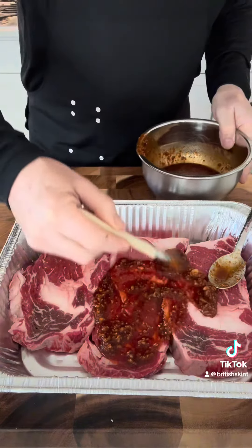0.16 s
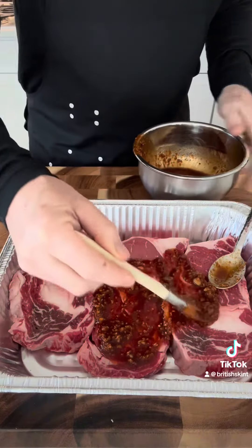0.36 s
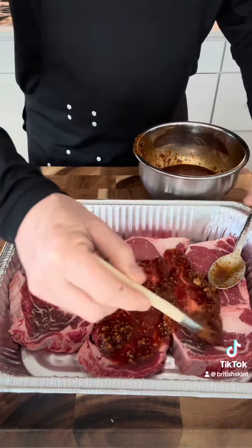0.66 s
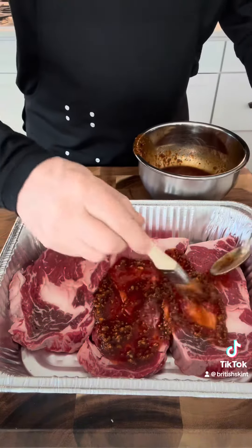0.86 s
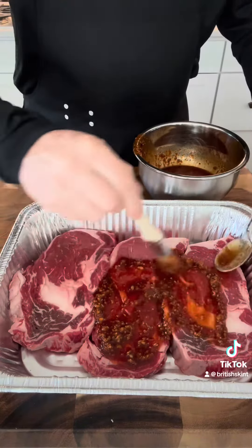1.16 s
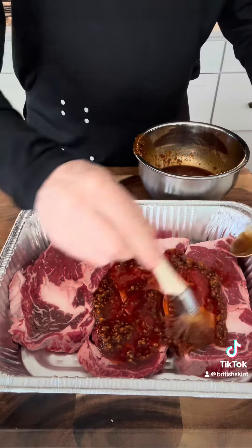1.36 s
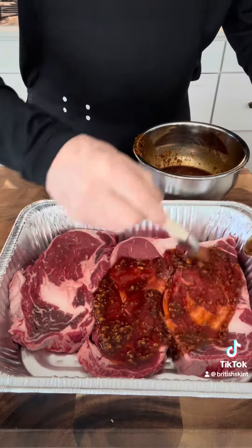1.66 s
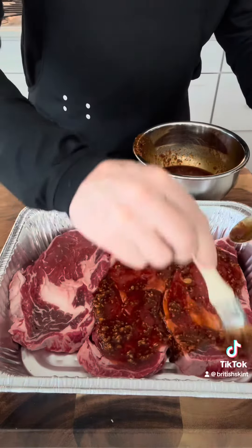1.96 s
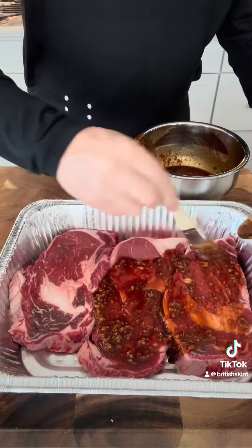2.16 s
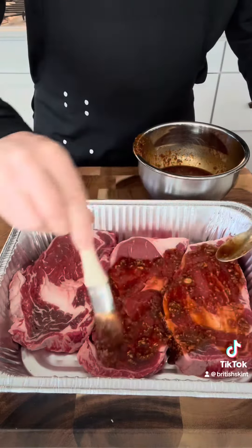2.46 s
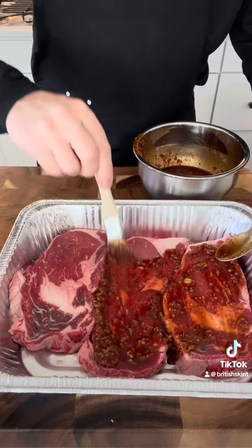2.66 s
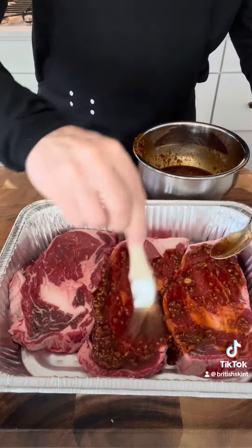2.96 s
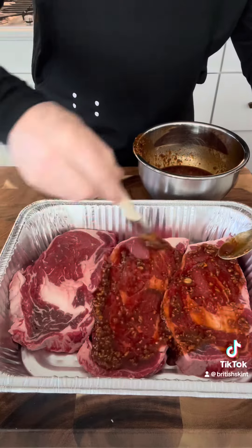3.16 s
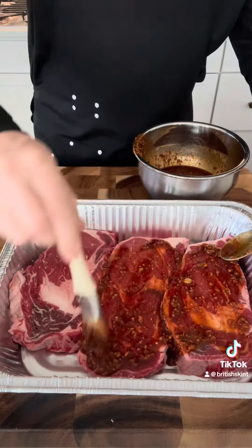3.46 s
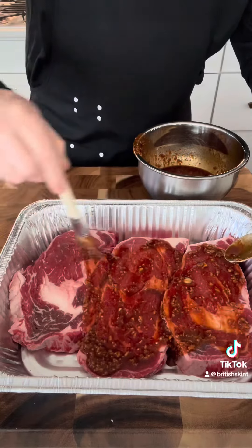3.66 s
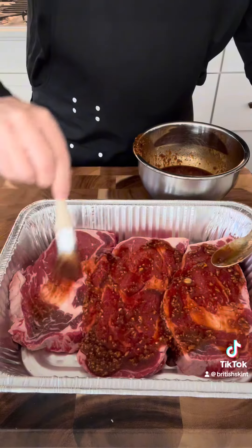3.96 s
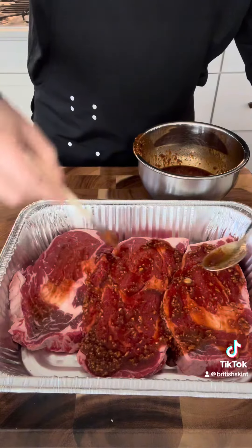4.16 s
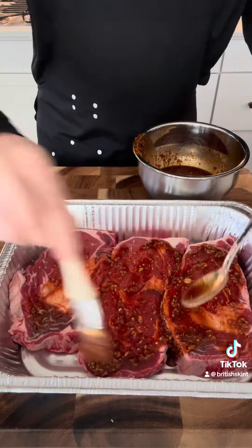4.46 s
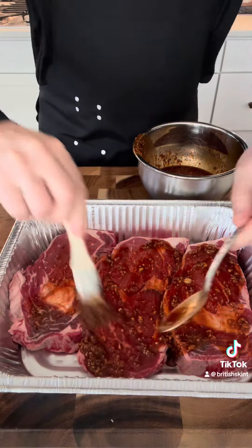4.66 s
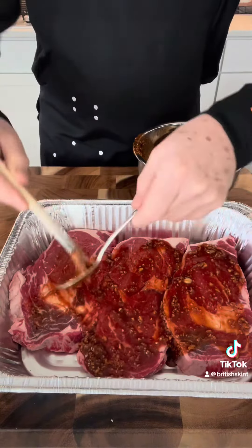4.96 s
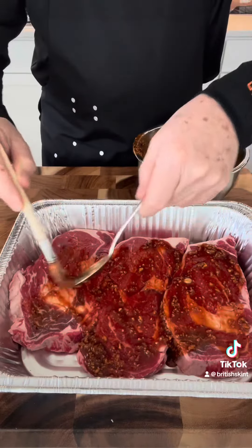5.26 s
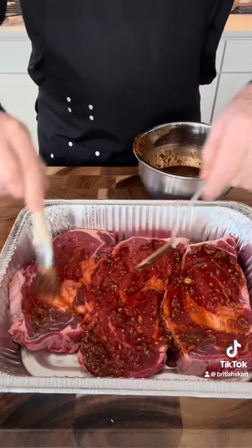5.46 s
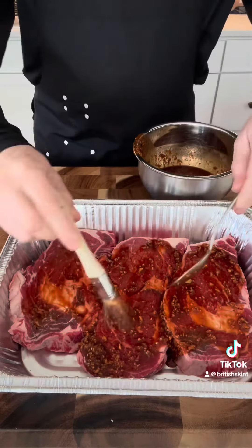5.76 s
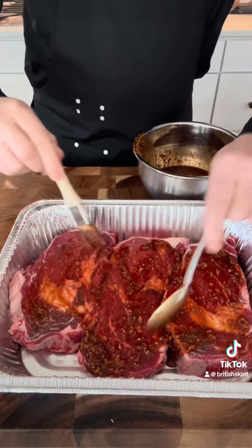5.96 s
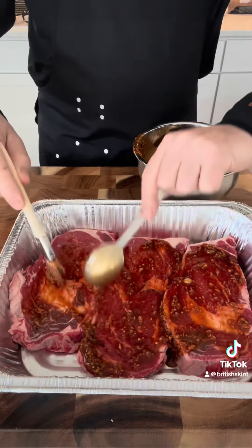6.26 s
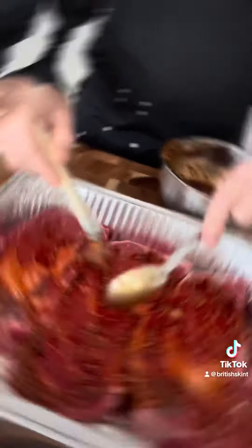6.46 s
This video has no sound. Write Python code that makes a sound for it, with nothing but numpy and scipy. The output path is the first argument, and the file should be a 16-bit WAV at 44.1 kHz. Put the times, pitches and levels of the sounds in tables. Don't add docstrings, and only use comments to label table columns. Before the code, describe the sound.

A low counter thump, then a steel bowl rocks and cracks against wood while a wet brush swishes and ticks softly over meat, fridge humming.

```python
import sys
import numpy as np
from scipy import signal
from scipy.fft import rfft, irfft, next_fast_len
from scipy.io import wavfile
from scipy.ndimage import uniform_filter1d, map_coordinates

SR = 44100
rng = np.random.default_rng(int(sys.argv[2]) if len(sys.argv) > 2 else 0)


def to_linear_factor(level_db):
    exponent = np.asarray(level_db, float) / 20
    return 10 ** exponent


def dump_mix(stems):
    frames = np.atleast_2d(stems).T
    limited = np.clip(frames, -1, 1)
    pcm = np.round(limited * 32767).astype(np.int16)
    wavfile.write(sys.argv[1], SR, pcm)


N = 291774
STEP = 32

# peak_s, swish_db, swell_s (time to change 5 dB), brightness_db
THICK_STROKES = [(.11, -82, .035, -3), (.207, -81, .055, 1), (.314, -79, .025, 2), (.378, -76, .018, -5),
                 (.44, -85, .035, -9), (.614, -85.5, .03, 0), (.818, -62.5, .02, -5), (.93, -84, .03, 2),
                 (1.23, -74, .04, 0), (1.365, -70.5, .04, -2), (1.48, -78.5, .037, -4),
                 (1.675, -81, .03, -2), (1.841, -80.5, .028, 7), (2.003, -68.5, .024, -1),
                 (2.09, -72.5, .033, -1), (2.272, -78.5, .022, 2), (2.33, -83, .04, 5),
                 (2.42, -79.5, .04, 6), (2.715, -82, .042, -1), (3.037, -78.5, .028, -3),
                 (4.223, -79, .022, -1), (4.539, -71.5, .017, 0), (4.66, -75, .03, 3),
                 (5.762, -74.5, .018, -3), (5.83, -85, .045, -9), (6.285, -83.5, .03, 0)]
# peak_s, swish_db, swell_s (time to change 5 dB), brightness_db
GLAZED_STROKES = [(3.21, -75.5, .03, 2), (3.5, -76.5, .02, 5), (3.535, -78, .024, 4), (3.62, -84, .03, 2),
                  (3.7, -74.5, .03, -1), (3.774, -60.5, .017, 4), (3.85, -82, .04, 2),
                  (3.924, -59.5, .019, 1), (4.0, -80, .025, 3), (4.1, -76.5, .023, -1),
                  (4.318, -67.5, .028, 2), (4.43, -81.5, .025, 1), (4.735, -75, .04, -1),
                  (4.958, -76.5, .014, 1), (5.004, -67.5, .017, -4), (5.066, -74.5, .02, -1),
                  (5.21, -81, .028, 3), (5.272, -78.5, .024, 1), (5.385, -85, .03, 6), (5.5, -78, .028, 2),
                  (5.56, -77.5, .032, 6), (5.935, -76, .028, 5), (6.123, -89, .048, 5),
                  (6.353, -83, .035, 7), (6.48, -87.5, .04, 4), (6.59, -84, .03, 5)]
# frequency_hz, density_db (per Hz)
CLATTER = [(100, -13.5), (480, -1.5), (1400, 1.5), (2000, -5.5), (2800, -12), (4500, -18.5), (6000, -48.5)]
# frequency_hz, level_db (relative to mid)
DIFFUSE = [(60, -24), (110, -17), (200, -8), (380, -6.5), (700, -2), (1290, 0), (2380, -1.5), (4400, 2.5),
           (8120, 2), (15000, -21)]


def unit(x):
    return x / np.sqrt(np.mean(x ** 2) + 1e-20)


def along(points, hz):
    f, v = np.transpose(points)
    return np.interp(np.log(hz + 1), np.log(f + 1), v)


def smooth(control):
    return np.interp(np.arange(N), np.arange(len(control)) * STEP, control)


def wobble(rate_hz):
    knots = rng.standard_normal(1000)
    return map_coordinates(knots, [np.arange(0, N, STEP) * rate_hz / SR])


def swell(peak_s, db, rise_s, fall_s):
    t = np.arange(0, N, STEP) / SR
    length = np.maximum(np.where(t < peak_s, rise_s, fall_s), 0.004)
    return db - 5 * (np.abs(t - peak_s) / length) ** 1.2


def coloured(x, points):
    m = next_fast_len(x.shape[-1])
    gain = to_linear_factor(along(points, np.fft.rfftfreq(m, 1 / SR)))
    return irfft(rfft(x, m) * gain, m)[..., :x.shape[-1]]


def spread(mid, other, side):
    s = coloured(other, side)
    return np.array([mid + s, mid - s])


def noise(spectrum, side, grit_db=0):
    m = next_fast_len(N)
    hz = np.fft.rfftfreq(m, 1 / SR)
    strength = np.minimum(rng.exponential(size=m), 6)
    grains = rng.standard_normal((2, m)) * to_linear_factor(grit_db * strength)
    mid_db = along(spectrum, hz)
    gain = to_linear_factor([mid_db, mid_db + along(side, hz)])
    mid, edge = irfft(rfft(grains) * gain, m)[:, :N]
    return np.array([mid + edge, mid - edge]) / np.std(mid)


def patchy(x, patchy_db):
    z = signal.stft(x, nperseg=512)[2]
    field = rng.standard_normal(z.shape[1:])
    field = uniform_filter1d(field, size=5, axis=0)
    field = uniform_filter1d(field, size=12, axis=1)
    return signal.istft(z * to_linear_factor(patchy_db * unit(field)), nperseg=512)[1][:, :N]


def ring(modes, t, attack_s, scatter_db):
    hz, db, t60 = np.transpose(modes)[..., None]
    level = db + scatter_db * rng.standard_normal(db.shape)
    tones = to_linear_factor(level - 60 * t / t60) * np.sin(2 * np.pi * hz * t)
    return tones.sum(0) * (1 - np.exp(-t / attack_s))


def burst(spectrum, t, attack_s, t60_s):
    x = coloured(rng.standard_normal(len(t)), spectrum)
    x = x * to_linear_factor(-60 * t / t60_s) * (1 - np.exp(-t / attack_s))
    return x / np.abs(x).max()


def add(track, start_s, x):
    i = round(start_s * SR)
    track[..., i:i + x.shape[-1]] += x[..., :max(N - i, 0)]


def bowl():
    # start_s, peak_db, crack_db, body_db
    contacts = [(0.661, -43, -22, -20), (0.6668, -26.5, -20, -20), (0.6823, -23, -18.5, -18),
                (0.7053, -23.5, -28.5, -16.5), (0.7169, -18.5, -22, -13.5), (0.7216, -20, -25.5, -16.5),
                (0.7251, -19.5, -30, -17), (0.7354, -26.5, -20.5, -19.5), (0.9861, -37.5, -25, -13),
                (0.9908, -17, -21, -8.5), (1.0375, -10.5, -14, -15), (1.0636, -16.5, -16.5, -14),
                (1.1867, -25.5, -18, -18), (1.4751, -53, -13, -14), (2.0766, -61, -23, -22),
                (4.534, -58, 1, -27), (4.985, -53, -26, -10.5)]
    # frequency_hz, level_db, t60_s
    board_modes = [(194.8, -17, 0.078), (483.6, -7, 0.046), (654, -3.5, 0.037), (880, -3, .026)]
    # frequency_hz, level_db, t60_s
    bowl_modes = [(1036, -3.5, .017), (1250, -2, 0.0197), (1510, -4, 0.015), (1764, -6.5, 0.024),
                  (2150, -11, 0.011), (2860, -12, 0.011), (3670, -12.5, 0.011)]
    # frequency_hz, density_db
    crack_colour = [(2500, -42), (4000, -6), (5500, -5), (6400, -4.5), (8300, -1.5), (10000, -3.5),
                    (13000, -12), (16000, -14.5)]
    # frequency_hz, gain_db
    knock_low_cut = [(50, -18), (170, -0.5)]
    out, t = np.zeros(N), np.arange(SR // 16) / SR
    for s, db, crack_db, body_db in contacts:
        tone = ring(bowl_modes, t, 0.0006, scatter_db=2)
        tone += to_linear_factor(body_db + 12) * ring(board_modes, t, 0.001, scatter_db=2)
        crack = to_linear_factor(crack_db + 5) * burst(crack_colour, t, 0.00018, 0.011)
        clatter = burst(CLATTER, t, 0.00052, 0.059)
        add(out, s + 0.001, to_linear_factor(db) * (to_linear_factor(-3.5) * tone + to_linear_factor(-7.5) * clatter + crack))
    return coloured(out, knock_low_cut) * (out != 0)


def counter():
    # start_s, peak_db
    bumps = [
        (0.019, -26.5),
        (0.291, -47),
        (0.374, -75),
        (4.984, -50),
        (5.283, -60),
    ]
    # frequency_hz, level_db, t60_s
    top_modes = [(72.8, -6, 0.41), (87.1, -3.5, 0.25), (128, -5, 0.18), (157.4, -7, 0.11),
                 (256, -10.5, 0.1), (481, -19.5, 0.079)]
    # frequency_hz, density_db (per Hz)
    thud_colour = [(60, -26), (150, 0.5), (300, 1), (650, -1), (1100, -21), (2500, -66)]
    out, t = np.zeros(N), np.arange(SR // 2) / SR
    for s, db in bumps:
        boom = to_linear_factor(db - 1.5) * ring(top_modes, t, 0.0049, scatter_db=0.8)
        thud = to_linear_factor(db - 16) * burst(thud_colour, t, 0.0012, 0.15)
        add(out, s, boom + thud)
    return out


def brush():
    # frequency_hz, density_db (per Hz)
    shaft_colour = [(4000, -34), (5200, -3), (6500, -2.5), (8000, -1.5), (10000, -0.5), (12000, -9),
                    (14000, -33)]
    # frequency_hz, density_db (per Hz)
    tip_colour = [(7000, -38.5), (9500, -7), (11500, -2.5), (14000, -1), (15300, -3), (15900, -34.5)]
    # frequency_hz, density_db (per Hz)
    drag_colour = [(1500, -34), (2800, -5.5), (3700, 0), (4600, -3.5), (6000, -37)]
    s, db, length, bright_db = np.transpose(THICK_STROKES + GLAZED_STROKES)[..., None]
    drag_db = np.repeat([2, -5], [len(THICK_STROKES), len(GLAZED_STROKES)])[:, None]
    swell_db = swell(s, db - 7, length, length * 1.1)

    def press(part_db):
        strokes = np.linalg.norm(to_linear_factor(swell_db + part_db), axis=0)
        return smooth(strokes * to_linear_factor(2.5 * wobble(100)))

    shafts = press(-bright_db / 2) * noise(shaft_colour, DIFFUSE, grit_db=4)
    tips = press(bright_db / 2) * noise(tip_colour, DIFFUSE, grit_db=4.5)
    drag = press(drag_db - bright_db / 2) * noise(drag_colour, DIFFUSE, grit_db=4.5)
    return patchy(shafts + tips + drag, patchy_db=2.5)


def faint_ticks():
    s, db, length, _ = np.repeat(THICK_STROKES + GLAZED_STROKES, 3, axis=0).T
    when, size, pitch = rng.standard_normal((len(s), 3)).T
    start_s = np.abs(s + length * when)
    level_db = -68 + (db + 75) + 3 * size
    pitch_hz = np.minimum(11500 * 2 ** (0.3 * pitch), 15000)
    return list(zip(start_s, level_db, pitch_hz))


def ticks():
    # start_s, peak_db, pitch_hz
    clear_ticks = [(0.3706, -58, 8240), (0.1006, -55, 7660), (.8215, -43, 8990), (.8505, -53, 11500),
                   (0.377, -62, 6190), (1.3506, -58, 8360), (1.3845, -50, 12770), (1.4749, -48.5, 10610),
                   (2.0006, -51, 10880), (2.0171, -43, 14640), (2.076, -47, 6150), (2.7125, -66, 7600),
                   (3.4946, -61, 11000), (5.0647, -56, 9670), (2.685, -59, 10400), (3.011, -50, 7720),
                   (3.0406, -62, 5760), (3.7282, -49.5, 10400), (3.7686, -46, 11300), (3.7363, -49.5, 6600),
                   (4.218, -61, 5680), (4.25, -39.5, 12980), (4.3198, -48, 12300), (4.5335, -45, 14390),
                   (4.6404, -40.5, 12840), (4.9485, -59, 10600), (5.5398, -58.5, 10900),
                   (5.7531, -58, 5570), (5.9173, -54.5, 13940), (6.269, -55, 12040)]
    # start_s, peak_db
    peeling = [
        (2.268, -54),
        (2.3036, -60),
        (2.3503, -70),
        (2.3917, -57),
        (2.428, -56.5),
        (2.4536, -60),
        (2.4701, -63),
    ]
    # start_s, peak_db, pitch_hz
    smacks = [(.018, -84, 630), (.0558, -68, 10600), (0.2034, -60.5, 10900), (0.3103, -60.5, 11100),
              (5.759, -52.5, 5660), (0.3776, -56, 2000), (1.3838, -55.5, 3930), (1.3985, -55, 3800),
              (1.4748, -51, 2080), (2.0008, -53, 3700), (2.0171, -60, 3800), (2.076, -43.5, 2060),
              (2.271, -65, 4080), (2.363, -56, 2950), (3.0412, -56, 4530), (4.2176, -58, 4090),
              (4.2485, -49.5, 4090), (4.5341, -48.5, 1554), (4.6437, -55, 3400), (5.7525, -55.5, 3600),
              (5.7588, -54, 3790)]
    out, t = np.zeros((2, N)), np.arange(SR // 50) / SR

    def place():
        return to_linear_factor(3.5 / 2 * rng.standard_normal() * np.array([[1], [-1]]))

    peel_ticks = [(s, db, 14200) for s, db in peeling]
    for s, db, hz in clear_ticks + peel_ticks + faint_ticks():
        colour = [(hz / 5, -36), (hz / 1.9, -15), (hz / 0.88, -4), (hz, 0), (hz * 1.2, -4), (hz * 2.4, -9)]
        add(out, s, to_linear_factor(db + 1) * burst(colour, t, 0.0002, 0.0067) * place())
    for s, db, hz in smacks:
        colour = [(hz / 2.2, -22), (hz / 1.12, -7), (hz, 0), (hz * 1.12, -7), (hz * 2.2, -24)]
        add(out, s, to_linear_factor(db) * burst(colour, t, 0.00057, 0.022) * place())
    return out


def spoon():
    drag_db = swell(4.54, -68.5, rise_s=0.09, fall_s=0.041)
    return smooth(to_linear_factor(drag_db + 2.1 * wobble(60))) * noise(CLATTER, DIFFUSE, grit_db=3.5)


def walls(x):
    # frequency_hz, t60_s
    tile_decay = [(100, 0.29), (500, 0.44), (1500, .55), (4000, 0.5), (10000, 0.36)]
    # frequency_hz, level_db
    tile_colour = [(100, 1), (1000, -7.5), (4000, -0.5), (10000, -8)]
    hz, t, z = signal.stft(rng.standard_normal((2, SR * 3 // 5)), SR, nperseg=256)
    level_db = along(tile_colour, hz)[:, None] - 60 * t / along(tile_decay, hz)[:, None]
    tail = signal.istft(z * to_linear_factor(level_db), SR, nperseg=256)[1]
    delayed = np.pad(x, (250, 0))[None]
    return signal.oaconvolve(delayed, tail / np.linalg.norm(tail[0]), axes=1)


def room(steady, moving):
    out = walls(steady)[:, :N]
    hop = round(0.045 * SR)
    for i in range(0, N, hop):
        if moving[i:i + hop].any():
            add(out, i / SR, walls(moving[i:i + hop]))
    return spread(out[0], to_linear_factor(-1.5) * out[1], DIFFUSE)


def kitchen():
    # time_s, level_db
    rumble_levels = [(0, -72), (.3, -58), (.44, -72.5), (.72, -68), (1.16, -74), (1.5, -79.5), (2.14, -78),
                     (2.5, -67), (2.75, -67), (3.11, -78.5), (3.41, -66.5), (3.72, -74.5), (4.75, -71.5),
                     (5.01, -67.5), (5.29, -65), (5.6, -68.5), (5.95, -72.5), (6.62, -72.5)]
    # frequency_hz, density_db (per Hz)
    rumble_colour = [(25, -22.5), (40, -9.5), (58, 9.5), (75, -3), (100, -16), (140, -62)]
    # frequency_hz, density_db (per Hz)
    air_colour = [(35, -30), (60, -1), (133, -1.5), (289, -10), (571, -9.5), (700, -12.5), (1000, -21.5),
                  (1900, -17), (3000, -24.5), (4600, -34.5), (5000, -45), (8200, -46.5), (12500, -48),
                  (15500, -63.5)]
    # frequency_hz, level_db (rms)
    hum_lines = [(119.6, -80), (288, -84), (468, -90), (576, -77), (2051, -93), (3597, -96), (11100, -107)]
    time_s, level_db = np.transpose(rumble_levels)
    rumble_db = np.interp(np.arange(0, N, STEP) / SR, time_s, level_db)
    rumble = smooth(to_linear_factor(rumble_db + 1.2 * wobble(5.6))) * noise(rumble_colour, DIFFUSE)
    air = smooth(to_linear_factor(-69 + 0.6 * wobble(1.3))) * patchy(noise(air_colour, DIFFUSE), patchy_db=1.5)
    t, lines = np.arange(N) / SR, np.zeros(N)
    for hz, db in hum_lines:
        level = smooth(to_linear_factor(db + 3.5 + 0.7 * wobble(6)))
        drift = smooth(0.25 * wobble(7.1))
        lines += level * np.sin(2 * np.pi * hz * t + drift)
    return rumble + air + lines


def scene():
    # frequency_hz, level_db
    direct_side = [(100, 11), (1000, 3), (2500, 2), (5000, 8), (8000, 1.5), (12000, -15.5)]
    bumps, knocks, wet = counter(), bowl(), ticks()
    ports = np.gradient(knocks)
    near = spread(knocks, ports, direct_side) + bumps + wet + brush() + spoon()
    echo = room(to_linear_factor(-7) * bumps + to_linear_factor(-14) * wet.mean(0), to_linear_factor(-10.5) * knocks)
    return near + echo + kitchen()


def roll_off(x):
    return signal.sosfilt(signal.butter(12, 16500, fs=SR, output="sos"), x)


def record(dry):
    # frequency_hz, gain_db
    microphone = [(25, -16.5), (45, -0.5), (15700, 0), (16300, -23)]
    mix = coloured(dry, microphone)
    return roll_off(mix)


dry = scene()
out = record(dry)
dump_mix(out)
```